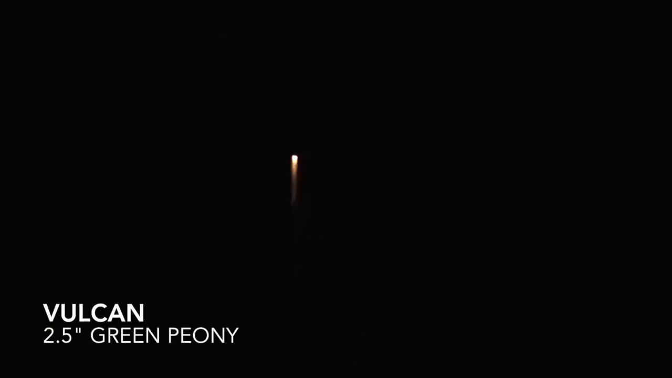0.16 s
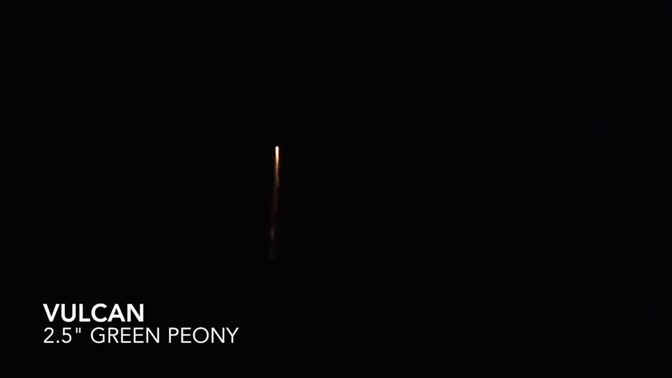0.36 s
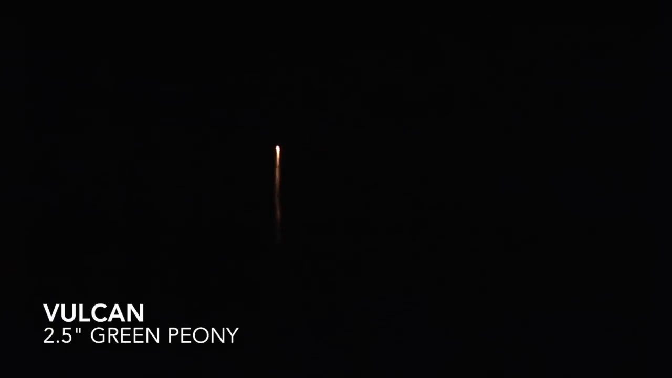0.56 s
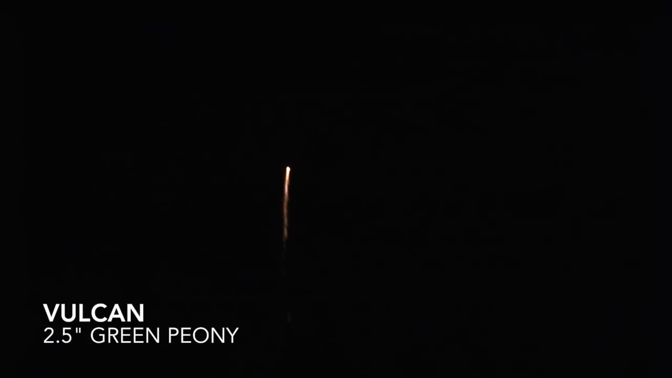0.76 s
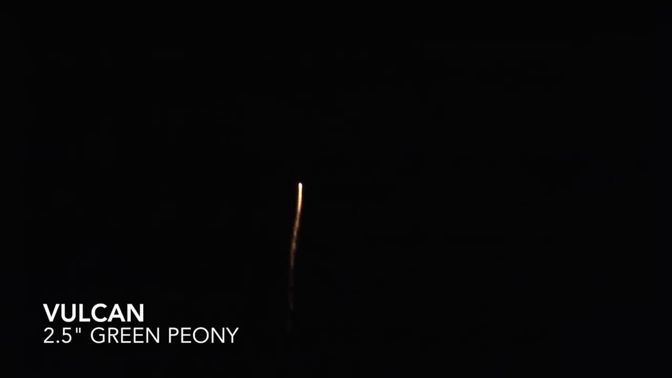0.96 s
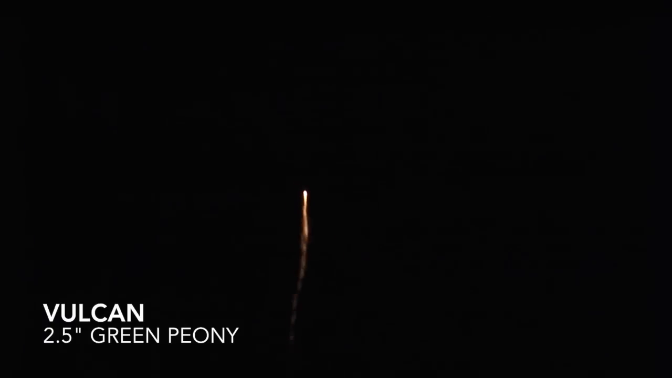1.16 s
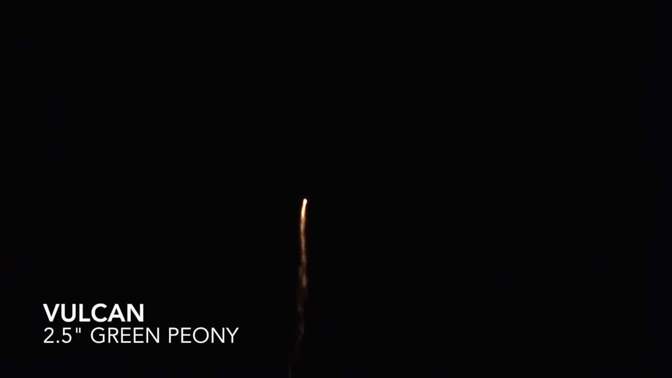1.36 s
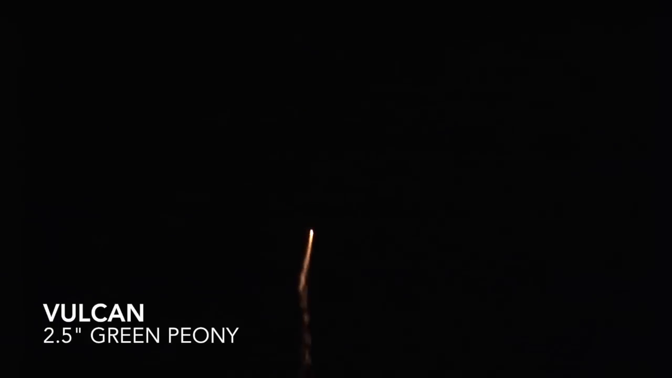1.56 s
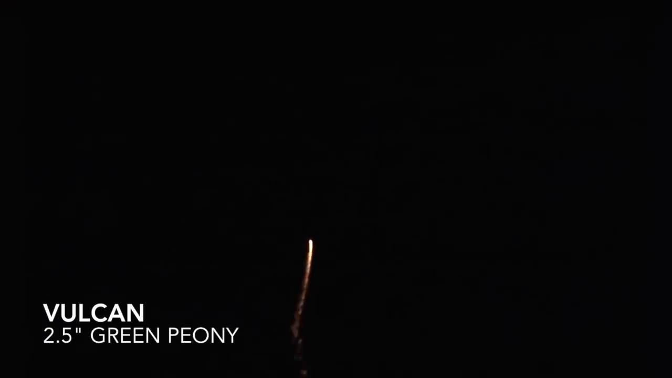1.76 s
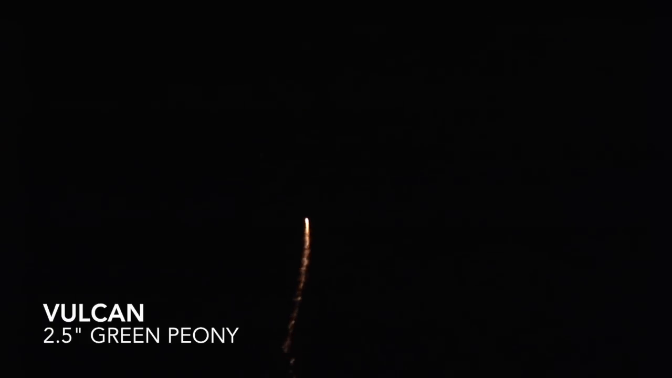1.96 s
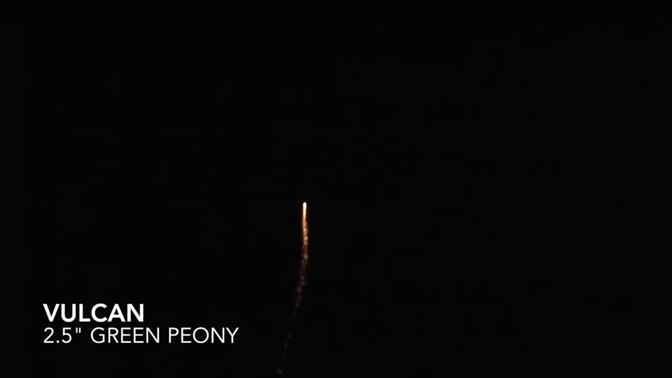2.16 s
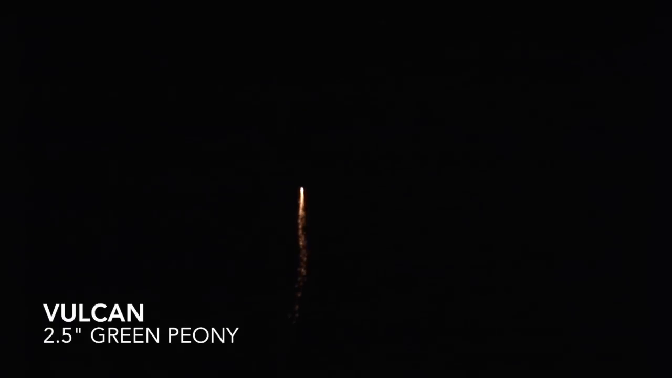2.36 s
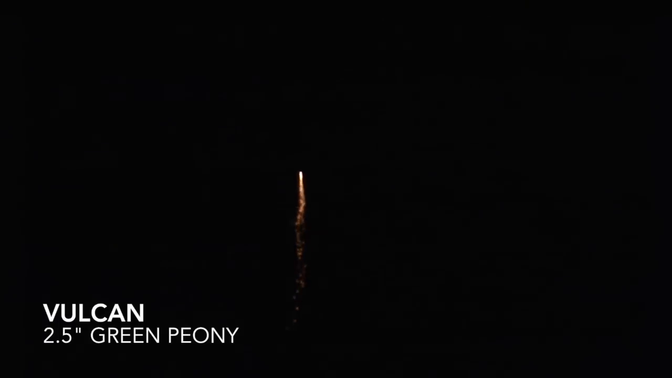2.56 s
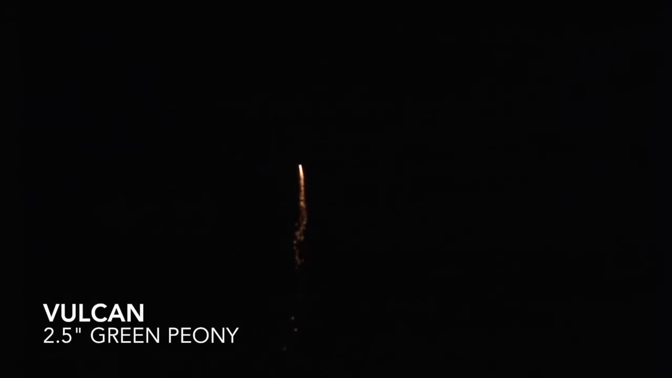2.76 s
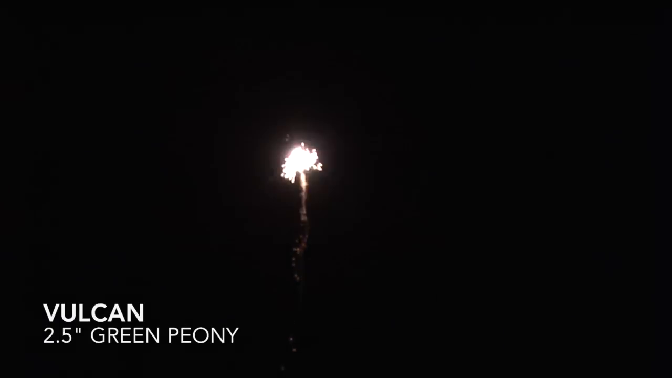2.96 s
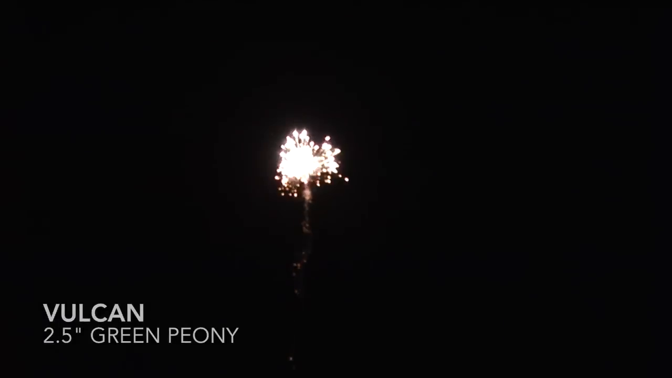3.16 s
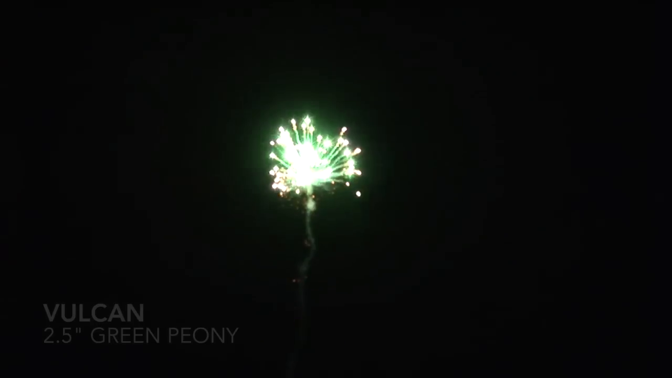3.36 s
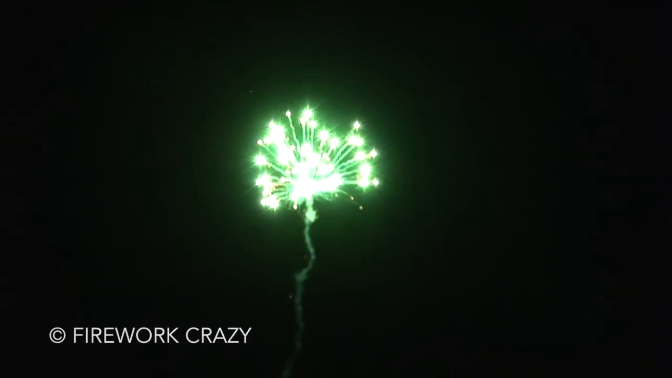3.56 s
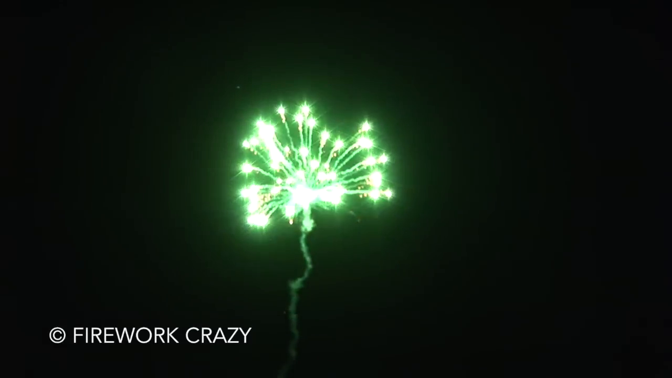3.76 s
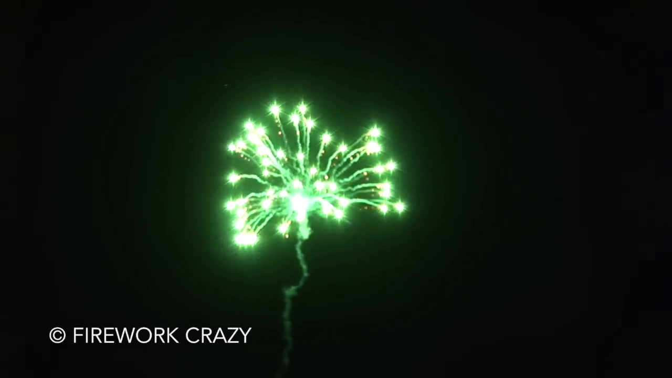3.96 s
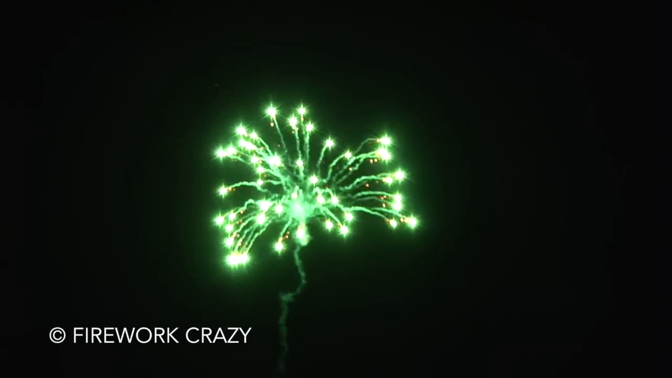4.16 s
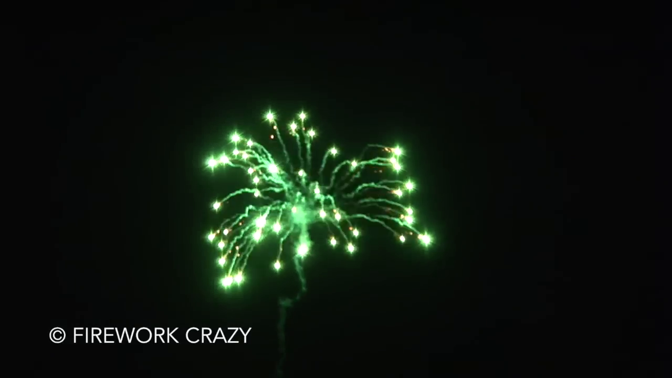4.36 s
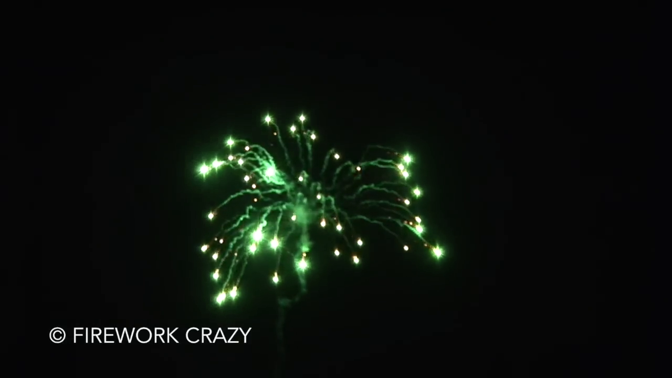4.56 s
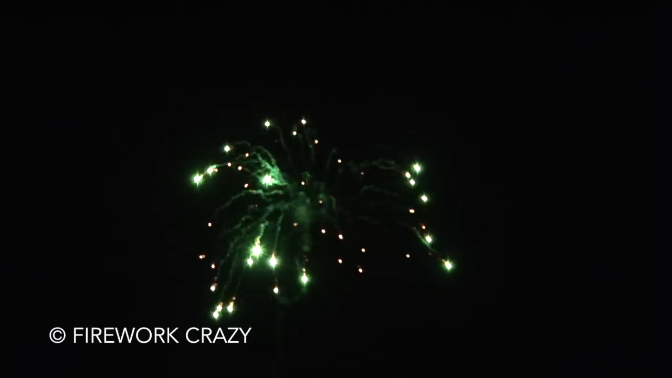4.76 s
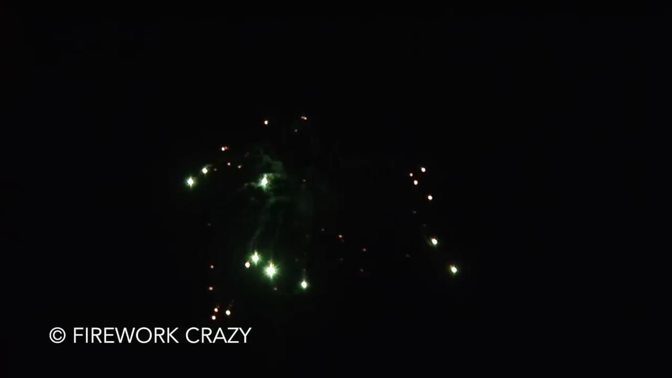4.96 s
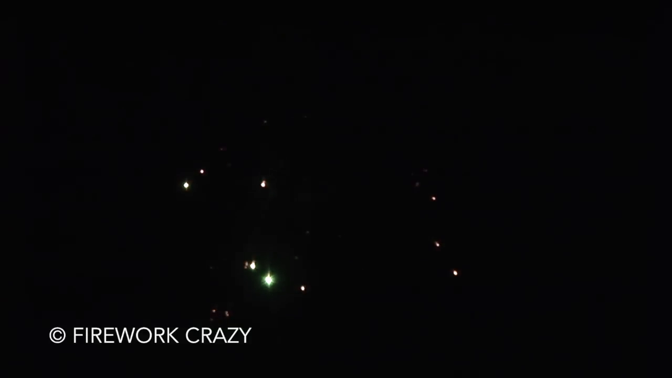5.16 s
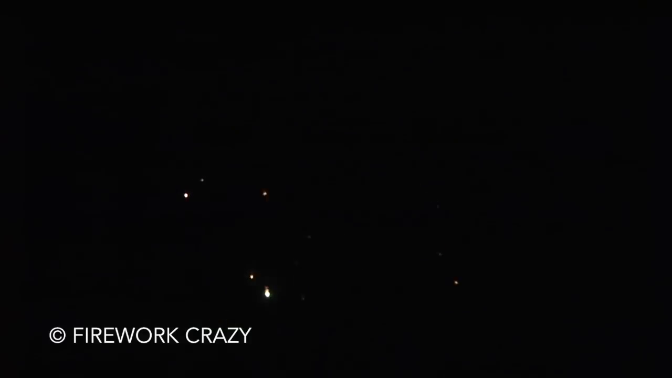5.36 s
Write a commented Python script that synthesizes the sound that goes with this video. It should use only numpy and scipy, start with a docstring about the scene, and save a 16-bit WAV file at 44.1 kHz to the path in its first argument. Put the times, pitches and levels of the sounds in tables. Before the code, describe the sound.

A firework shell hisses and sputters upward before a single loud bang cracks overhead and rolls away through the night air.

```python
"""A firework lifts off 28 m from the microphone, in open country at night, and climbs on a hissing jet.
The tail sputters, two sparks snap, and after a last spurt the shell bursts with one sharp bang and a sizzle.
The shock overloads the microphone, slaps back off the ground and nearby walls, then rolls over the land.
A far engine drones under the quiet air; near the end something close on the right ticks and squeaks."""
import sys
import numpy as np
from scipy import signal
from scipy.fft import rfft, irfft, next_fast_len
from scipy.io import wavfile
from scipy.ndimage import map_coordinates

SR = 44100
rng = np.random.default_rng(int(sys.argv[2]) if len(sys.argv) > 2 else 0)


def wav_record(signal):
    """Record a signal, one row per channel, as 16-bit PCM in the file named by sys.argv[1]."""
    frames = np.transpose(np.atleast_2d(signal))
    bounded = np.clip(frames, -1, 1)
    # unit amplitude maps onto the largest positive 16-bit level
    quanta = np.round(bounded * 32767).astype(np.int16)
    wavfile.write(sys.argv[1], SR, quanta)


N = 238889

# the far engine swells and sinks, loudest at the end: time_s, level_db
ENGINE_LEVELS = [(0, -58), (1.0, -55.5), (1.45, -58), (2.0, -54.5), (2.7, -61), (3.8, -56), (4.4, -58),
                 (4.7, -53.5), (5.42, -51.5)]
# its harmonics: multiple, level_db
ENGINE_ORDERS = [(1, -3.5), (2, 2.5), (3, -7.5)]
# spurts of flame on the way up: peak_s, hiss_db, fizz_db, half_width_s
FLAME_SPURTS = [(.002, -25, -42, .003), (0.016, -24.5, -44, 0.0096), (.04, -32, -56, 0.011),
                (.088, -35.5, -61, .007), (.157, -41.5, -64, 0.013), (.41, -49, -64, .03),
                (0.578, -49, -78, 0.038), (.83, -48.5, -70, 0.033), (.952, -48, -70, 0.021),
                (1.22, -51.5, -70, 0.058), (1.32, -50, -71, 0.028), (1.433, -53, -75, 0.028),
                (1.697, -47, -69, .035), (2.02, -55.5, -75, .055), (2.23, -54.5, -74, 0.045),
                (2.332, -56.5, -85, 0.045), (2.496, -63, -70, 0.055), (2.908, -52, -82, 0.063),
                (3.08, -53, -76, 0.065), (3.189, -35.5, -61, 0.0077), (3.205, -33.5, -58, .01),
                (3.242, -33.5, -59, 0.0067)]
# the lift-off's own thump, then two dull echoes of the bang: start_s, level_db, pitch_hz, swell_s
LOW_THUMPS = [(.004, -41, 150, 0.012), (3.3885, -37, 150, 0.0041), (3.4106, -23, 148, 0.0062)]
# stretches of land, near to far: delay_s, body_db, treble_db, rise_s, body_t60_s
LAND_STRETCHES = [(.03, -46.5, -47, .008, 1.5), (.185, -37.5, -40.5, .044, 0.37),
                  (.252, -37.5, -47, .009, 0.18), (.32, -46.5, -50, 0.03, 0.57),
                  (.44, -37.5, -49, .075, 2.42), (.66, -47, -59, 0.018, .7), (.87, -51, -58.5, .012, .3),
                  (1.02, -50.5, -66, .02, 0.38), (1.134, -52, -62, .026, .2), (1.32, -53, -66, 0.053, 0.28),
                  (1.52, -58, -57, 0.069, 1.45), (1.6, -55.5, -68, 0.1, 4)]
# snapping sparks: start_s, level_db, t60_s
SPARK_SNAPS = [(1.1595, -34, .021), (1.6862, -37.5, .026)]
# the ring of a spark: pitch_hz, level_db
SPARK_RING = [(2800, -3), (4830, -4)]
# the bang off ground and walls: start_s, gain_db, low_cut_hz, high_cut_hz, left_over_right_db
SLAPBACKS = [(3.2506, 7.5, 290, 6500, 5), (3.2558, 26.5, 140, 999, 1), (3.2576, 5.5, 499, 3200, -4.5),
             (3.2606, 16.5, 400, 760, 8), (3.2643, 6, 410, 631, -6), (3.27, .5, 440, 780, 6),
             (3.5412, 1.5, 700, 1150, 4), (3.5534, 0, 450, 800, -2), (3.5653, -0.5, 500, 1000, 0),
             (3.676, -4, 600, 1200, 3), (3.708, -3, 600, 1200, 2), (3.805, -10, 600, 1200, 0),
             (3.903, -8, 600, 1200, 2), (3.978, -7, 600, 1200, 0), (4.111, -11, 700, 1800, -2),
             (4.143, -8.5, 600, 1200, -2), (4.241, -14, 600, 1200, 0), (4.283, -14, 600, 1200, 0),
             (4.3883, -13.5, 600, 1400, -0.5)]
# ticks near the microphone: start_s, level_db, t60_s, pitch_hz, left_over_right_db
CLOSE_TICKS = [(4.9238, -55, .022, 4300, -10), (4.9245, -58, .02, 5750, -10),
               (4.9759, -46.5, .022, 3560, -7.5), (4.981, -52, .03, 3400, -7.5)]
# the course of the squeak: time_s, base_pitch_hz, level_db
SQUEAK_PATH = [(4.954, 2050, -78), (4.965, 1980, -73), (4.974, 1760, -79), (4.984, 1780, -79),
               (4.993, 1980, -74), (5.005, 2055, -78), (5.028, 2100, -77), (5.047, 2090, -79)]
# the harmonics it sounds: multiple, level_db
SQUEAK_HARMONICS = [(2, 0), (3, -1)]
# spectra of night air, jet, fizz, rolling echo, spark and shock front: frequency_hz, relative_db
AIR_SPECTRUM = [(20, 0.5), (60, -.5), (100, -3), (170, -9.5), (350, -14), (1000, -14.5), (1500, -21),
                (2500, -26), (4000, -32.5), (7000, -39.5), (13000, -38.5), (15500, -50)]
HISS_SPECTRUM = [(180, -17), (280, -13), (380, -13), (520, -8.5), (850, -13), (1200, -5.5), (1500, -7.5),
                 (2100, -.5), (2450, 0), (2680, -2.5), (2950, 0), (3800, -4), (4300, -9), (5000, -10),
                 (5700, -16), (6800, -29), (9300, -30), (15500, -50.5)]
FIZZ_SPECTRUM = [(4000, -25), (6500, -2), (7500, -7), (8300, 0), (9500, 2.5), (11000, -2.5), (12300, 1.5),
                 (13500, -4.5), (15500, -11)]
ROLL_BODY_SPECTRUM = [(60, -17), (150, -9), (280, -10), (480, -2.5), (750, 0.5), (1050, 2.5), (1400, -4),
                      (2000, -13), (3000, -32.5), (6000, -59.5)]
ROLL_TREBLE_SPECTRUM = [(900, -19.5), (1600, -7), (2150, -0.5), (2600, -5.5), (3020, 2), (3600, -9),
                        (4500, -11), (5000, -16.5), (5700, -16.5), (6500, -35), (15000, -48)]
SNAP_SPECTRUM = [(500, -28), (1500, 0), (2700, 8), (3700, -0.5), (5000, 0), (7000, -14.5), (9000, -16),
                 (12000, -12), (15500, -20)]
BLAST_SPECTRUM = [(20, 6), (90, 22), (170, 31), (600, 32), (1200, 29.6), (1600, 22.5), (2100, 31),
                  (3200, 26.5), (4600, 15), (6500, 5.5), (8000, -14.5), (10000, 6), (12300, -5.5),
                  (15000, -4.5)]
# how alike left and right are, for sound from the sky and from the land: frequency_hz, correlation
SKY_LIKENESS = [(120, 0.98), (300, .9), (600, .58), (1100, .72), (1600, .87), (2200, 1), (3800, 1),
                (5200, .65), (8000, 0.2), (12000, .4)]
LAND_LIKENESS = [(130, .99), (300, 0.85), (600, .22), (1100, .42), (2300, 0.3), (3700, .1), (5300, 0),
                 (8000, -.2), (12000, .1)]
# a hollow by the microphone swallows one pitch and rings just above it: pitch_hz, width_hz, gain_db
MIC_HOLLOW = [(4530, 330, -14), (4940, 150, 6.5)]
# the microphone's stereo width: frequency_hz, side_db
MIC_WIDTH = [(200, -1), (1700, 0), (2400, -2), (3100, -12), (3700, -2), (6000, 3.5), (8500, 2), (10400, -7),
             (12000, 0), (15000, 0)]

DISTANCE_M, APEX_M, BURST_S = 28, 83.5, 3.2488  # microphone to launch spot; height and time of the burst
GROUND_DB, GROUND_LAG_MS = -5.5, [6.5, 7]  # the ground bounce; its lag at lift-off and at the top
LIFT_HISS_DB, LIFT_FIZZ_DB, LIFT_BODY_DB = -30, -42, -42  # the rush of gas at lift-off
LIFT_T60_S, LIFT_FIZZ_T60_S = .66, .35
JET_DB, FIZZ_DB, JET_ROLL_DB = -46, -64.5, -63  # jet and sparks at ground level; their wash off the land
FIZZ_END_S, FIZZ_DROP_DB = 1.82, 8.5  # most sparks are spent about halfway through the flight
LIFT_ECHO_DB = -15  # the land's answer to the lift-off, against its answer to the burst
SCATTER_BODY_DB, SCATTER_TREBLE_DB, SCATTER_T60_S = -21.5, -23.5, .065  # things near the microphone
TREBLE_LIFE = .7  # an echo's treble lasts this share of its body's t60
AIR_TOP_HZ, TOP_HZ = 3700, 15900  # the air's cut-off after one second of travel; the microphone's


def amp(db):
    """Decibels to gain."""
    return 10 ** (np.asarray(db) / 20)


def unit(x):
    """Scale to rms 1."""
    return x / np.sqrt(np.mean(x ** 2) + 1e-20)


def clock():
    """The time of every sample."""
    return np.arange(N) / SR


def along(points, hz):
    """Read (frequency_hz, value) points on a log axis."""
    frequencies, values = np.transpose(points)
    return np.interp(np.log(hz + 1), np.log(frequencies + 1), values)


def curves(rows):
    """One value per sample for each column after the time."""
    times, *columns = np.transpose(rows)
    return [np.interp(clock(), times, column) for column in columns]


def wobble(rate):
    """A smooth random curve, rate knots a second."""
    return map_coordinates(rng.standard_normal(int(N * rate / SR) + 4), [clock() * rate])


def fading(start_s, t60_s):
    """A gain that jumps to 1 and dies away."""
    age = clock() - start_s
    return (age >= 0) * amp(-60 * np.maximum(age, 0) / t60_s)


def swell(peak_s, half_width_s):
    """A bell-shaped gain."""
    return np.exp(-((clock() - peak_s) / half_width_s) ** 2 / 2)


def answer(peak_s, rise_s, t60_s):
    """A gain that swells to its peak, then dies away."""
    return np.where(clock() < peak_s, swell(peak_s, rise_s), fading(peak_s, t60_s))


def together(gains):
    """The joint level of unrelated noises."""
    return np.sqrt(sum(gain ** 2 for gain in gains))


def filtered(x, response):
    """Shape x by a response of frequency."""
    size = next_fast_len(N + SR // 2)
    return irfft(rfft(x, size) * response(np.fft.rfftfreq(size, 1 / SR)), size)[..., :N]


def cut(x, order, hz, kind="lowpass"):
    """Roll off the treble, or with "highpass" the bass."""
    return signal.sosfilt(signal.butter(order, hz, kind, fs=SR, output="sos"), x)


def rush(spectrum, likeness, grain_db, grain_rate):
    """Stereo noise of rms 1, clumped into grains of uneven size."""
    def mid_and_side(hz):
        angle = np.arccos(np.clip(along(likeness, hz), -1, 1)) / 2
        return amp(along(spectrum, hz)) * np.array([np.cos(angle), np.sin(angle)])
    grains = rng.standard_normal((2, N)) * amp(grain_db * wobble(grain_rate))
    mid, side = filtered(grains, mid_and_side)
    return unit(np.array([mid + side, mid - side]))


def shock(spectrum, size=4096):
    """A pressure pulse with the given spectrum and its energy packed at the front."""
    magnitude = amp(along(spectrum, np.fft.rfftfreq(size, 1 / SR)))
    cepstrum = irfft(np.log(magnitude))
    fold = np.r_[1, np.full(size // 2 - 1, 2), 1, np.zeros(size // 2 - 1)]  # minimum phase
    return irfft(np.exp(rfft(cepstrum * fold)))


def rough_ring(hz, age, rough):
    """A ring whose phase wanders, so that it sounds dry rather than glassy."""
    drift = rough * np.cumsum(rng.standard_normal(len(age)))
    return np.sin(2 * np.pi * hz * age + drift)


def panned(sound, pan_db):
    """Place a sound with the left pan_db above the right."""
    return amp([[pan_db / 2], [-pan_db / 2]]) * sound


def add(track, start_s, sound, pan_db=0):
    """Mix a sound into a stereo track."""
    part = track[:, round(start_s * SR):][:, :len(sound)]
    part += panned(sound[:part.shape[1]], pan_db)


def far_engine(turn_hz=29.6, drift=.025):
    """An engine a long way off drones at multiples of its unsteady turning rate."""
    level_db, = curves(ENGINE_LEVELS)
    turns = np.cumsum(turn_hz * (1 + drift * wobble(4.5))) / SR
    drone = sum(amp(db + 2.5 * wobble(9)) * np.sin(2 * np.pi * order * turns)
                for order, db in ENGINE_ORDERS)
    return amp(level_db) * drone


def night_air():
    """The faint, low rush of open air around the microphone."""
    return amp(-55.5) * rush(AIR_SPECTRUM, LAND_LIKENESS, grain_db=1, grain_rate=15)


def shell_range():
    """Metres from microphone to shell, which slows under gravity until it stands still at the top."""
    height = APEX_M * (1 - (1 - clock() / BURST_S) ** 2)
    return np.hypot(DISTANCE_M, height)


def burning_tail(sputter_db=.37, fizz_sputter_db=.3, sputter_rate=10):
    """The jet rushes at lift-off, then hisses, fizzes and spurts, fading with distance until the burst."""
    t, sputter = clock(), wobble(sputter_rate)
    burning = np.clip((BURST_S - t) / .03, 0, 1)
    reach = burning * DISTANCE_M / shell_range()
    spent = np.clip((t - FIZZ_END_S) / .1 + .5, 0, 1)
    hiss_db = JET_DB + sputter_db * sputter + .7 * wobble(30)
    fizz_db = FIZZ_DB - FIZZ_DROP_DB * spent + fizz_sputter_db * sputter + 1.3 * wobble(22)
    hiss_gains = [reach * amp(hiss_db), amp(LIFT_HISS_DB) * fading(0, LIFT_T60_S)]
    fizz_gains = [reach * amp(fizz_db), amp(LIFT_FIZZ_DB) * fading(0, LIFT_FIZZ_T60_S)]
    for peak_s, spurt_hiss_db, spurt_fizz_db, half_width_s in FLAME_SPURTS:
        spurt = swell(peak_s, half_width_s)
        hiss_gains.append(amp(spurt_hiss_db) * spurt)
        fizz_gains.append(amp(spurt_fizz_db) * spurt)
    hiss = together(hiss_gains) * rush(HISS_SPECTRUM, SKY_LIKENESS, grain_db=1.6, grain_rate=1200)
    fizz = together(fizz_gains) * rush(FIZZ_SPECTRUM, SKY_LIKENESS, grain_db=2, grain_rate=1300)
    return hiss + fizz


def ground_bounce(direct, cut_hz=1700):
    """Sound from the sky arrives twice; the dull copy off the ground lags more as the shell climbs."""
    lag_s = np.interp(shell_range(), [DISTANCE_M, np.hypot(DISTANCE_M, APEX_M)], GROUND_LAG_MS) / 1000
    bounce = [np.interp(clock() - lag_s, clock(), channel, left=0) for channel in cut(direct, 1, cut_hz)]
    return direct + amp(GROUND_DB) * np.array(bounce)


def rolling_echo(lean_left_db=1.0, rattle_db=1.4, rattle_rate=110):
    """Each stretch of land answers lift-off and burst with a swell; things close by scatter the bang."""
    def bright():
        return rush(ROLL_TREBLE_SPECTRUM, LAND_LIKENESS, grain_db=1.5, grain_rate=830)

    def answers(delay_s, rise_s, t60_s):
        lift = amp(LIFT_ECHO_DB) * answer(delay_s, rise_s, t60_s)
        return together([lift, answer(BURST_S + delay_s, rise_s, t60_s)])

    scatter, after_burst = fading(BURST_S, SCATTER_T60_S), clock() > BURST_S
    body_gains = [amp(SCATTER_BODY_DB) * scatter,
                  amp(LIFT_BODY_DB) * fading(0, LIFT_T60_S),
                  amp(JET_ROLL_DB) * ~after_burst]
    treble = amp(SCATTER_TREBLE_DB) * scatter * bright()
    for delay_s, body_db, treble_db, rise_s, t60_s in LAND_STRETCHES:
        body_gains.append(amp(body_db) * answers(delay_s, rise_s, t60_s))
        through_air = cut(bright(), 4, min(AIR_TOP_HZ / np.sqrt(delay_s), TOP_HZ))
        treble += amp(treble_db) * answers(delay_s, rise_s, t60_s * TREBLE_LIFE) * through_air
    rattle = unit(amp(rattle_db * wobble(rattle_rate)))
    body = rattle * rush(ROLL_BODY_SPECTRUM, LAND_LIKENESS, grain_db=1.5, grain_rate=600)
    lean = amp(np.outer([1, -1], after_burst) * lean_left_db / 2)
    return (treble + together(body_gains) * body) * lean


def low_thumps():
    """A few low cycles each: the lift-off's own thump, then two dull echoes of the bang."""
    out = np.zeros(N)
    for start_s, db, hz, swell_s in LOW_THUMPS:
        age = np.maximum(clock() - start_s, 0)
        rise = age / swell_s
        envelope = rise * np.exp((1 - rise ** 2) / 2)
        out += amp(db) * envelope * np.sin(2 * np.pi * hz * age)
    return out


def sparks(crack_db=1.5):
    """Each spark is a short crack with a brief two-note ring."""
    out = np.zeros((2, N))
    age = np.arange(SR // 10) / SR
    for start_s, db, t60_s in SPARK_SNAPS:
        crack = np.convolve(rng.standard_normal(len(age)), shock(SNAP_SPECTRUM))[:len(age)]
        ring = sum(amp(level) * rough_ring(hz, age, rough=.11) for hz, level in SPARK_RING)
        add(out, start_s, amp(db - 60 * age / t60_s) * (amp(crack_db) * unit(crack) + ring))
    return out


def bang(near_top_hz=3800, far_top_hz=2200, lag_ms=.015):
    """The shock front from high above, and its duller copies off the ground and walls."""
    out = np.zeros((2, N))
    add(out, BURST_S, shock(BLAST_SPECTRUM))
    impulse = signal.unit_impulse(SR // 20)
    for start_s, db, low_cut_hz, high_cut_hz, pan_db in SLAPBACKS:
        slap = cut(impulse, 2, low_cut_hz, "highpass")  # small surfaces lose the bass
        slap = cut(slap, 2, high_cut_hz)  # rough ones the treble
        top_hz = np.interp(start_s - BURST_S, [0, .25], [near_top_hz, far_top_hz])
        slap = cut(slap, 4, top_hz)  # and a long path through the air the very top
        add(out, start_s, amp(db) * slap, pan_db)
    # the front reaches the microphone's right side a hair before its left
    delays_s = np.array([[.5], [-.5]]) * lag_ms / 1000
    return filtered(out, lambda hz: np.exp(-2j * np.pi * hz * delays_s))


def stars():
    """High up, the scattered stars catch fire with a flash of fine sizzle that soon dies."""
    spectrum = [(6000, -30), (8500, -13), (10500, 0), (13000, -1), (15500, -14)]
    sizzle = rush(spectrum, SKY_LIKENESS, grain_db=3, grain_rate=1200)
    return (amp(-40) * fading(BURST_S, t60_s=.06) + amp(-61) * fading(BURST_S, t60_s=.9)) * sizzle


def ticks(overtone=3.36, overtone_db=-4, scratch_db=-13):
    """Small rough ticks close on the right: a ring, one bright overtone and a scratch."""
    out = np.zeros((2, N))
    age = np.arange(SR // 10) / SR
    for start_s, db, t60_s, hz, pan_db in CLOSE_TICKS:
        ring = rough_ring(hz, age, rough=.22)
        ring += amp(overtone_db) * rough_ring(overtone * hz, age, rough=.33)
        scratch = amp(scratch_db) * rng.standard_normal(len(age))
        add(out, start_s, amp(db - 60 * age / t60_s) * (ring + scratch), pan_db)
    return out


def squeak(pan_db=-6, jitter=.014, flutter_db=3):
    """A thin squeak close on the right: its pitch dips, recovers and holds."""
    hz, db = curves(SQUEAK_PATH)
    phase = 2 * np.pi * np.cumsum(hz * (1 + jitter * wobble(900))) / SR
    start_s, end_s = SQUEAK_PATH[0][0], SQUEAK_PATH[-1][0]
    gate = np.clip(np.minimum(clock() - start_s, end_s - clock()) / .003, 0, 1)
    tone = sum(amp(level) * np.sin(order * phase) for order, level in SQUEAK_HARMONICS)
    return panned(gate * amp(db + flutter_db * wobble(150)) * tone, pan_db)


def scene():
    """Everything as it reaches the microphone: from the sky, from close by and from far off."""
    climb = ground_bounce(burning_tail()) + sparks()
    close_by = ticks() + squeak()
    burst = bang() + stars()
    return climb + close_by + burst + low_thumps() + rolling_echo() + far_engine() + night_air()


def record(dry, low_cut_hz=48):
    """The microphone colours the sound, clips on the shock, shapes the width and trims bass and top."""
    def hollow(f):
        return 1 + sum((amp(db) - 1) * 1j * f * width / (hz ** 2 - f ** 2 + 1j * f * width)
                       for hz, width, db in MIC_HOLLOW)
    left, right = np.clip(filtered(dry, hollow), -1, 1)
    mid = (left + right) / 2
    side = filtered((left - right) / 2, lambda hz: amp(along(MIC_WIDTH, hz)))
    thinned = cut(np.array([mid + side, mid - side]), 1, low_cut_hz, "highpass")
    return filtered(thinned, lambda hz: 1 / (1 + (hz / TOP_HZ) ** 80))


dry = scene()
out = record(dry)
wav_record(out)
```